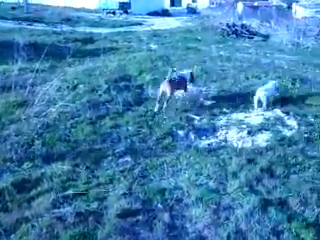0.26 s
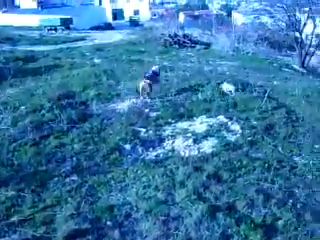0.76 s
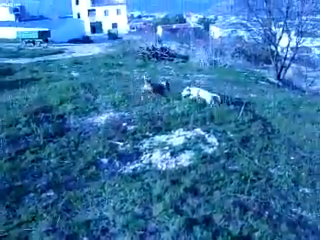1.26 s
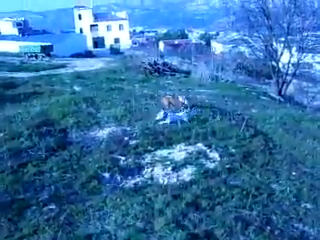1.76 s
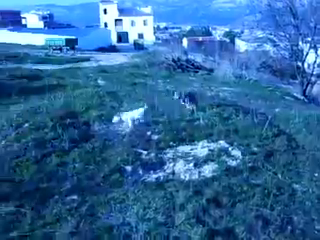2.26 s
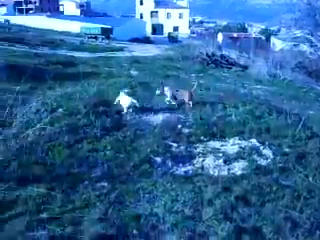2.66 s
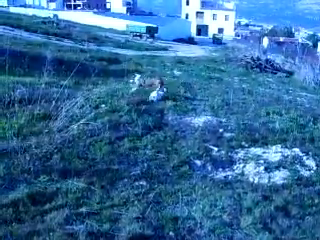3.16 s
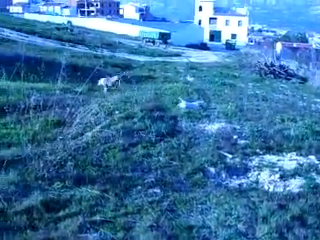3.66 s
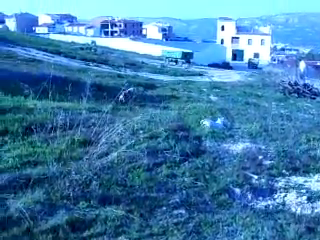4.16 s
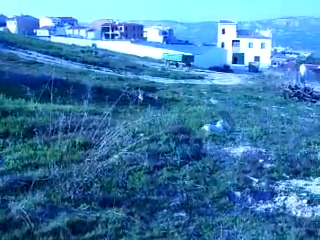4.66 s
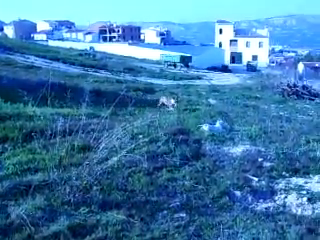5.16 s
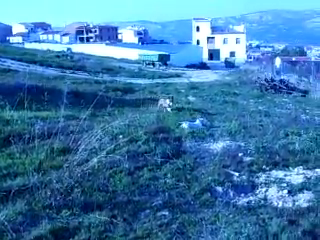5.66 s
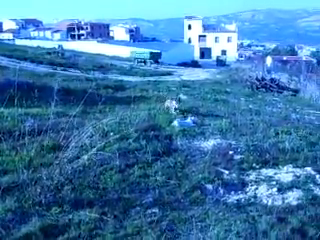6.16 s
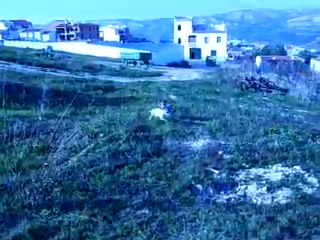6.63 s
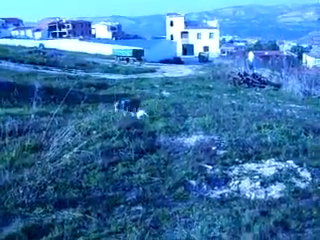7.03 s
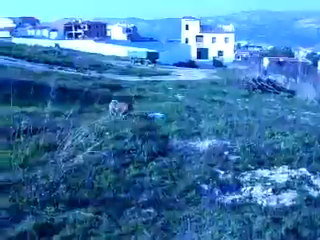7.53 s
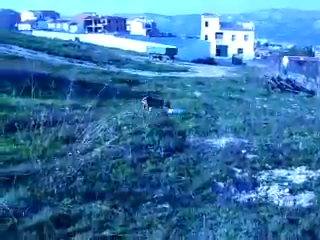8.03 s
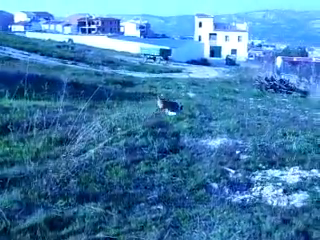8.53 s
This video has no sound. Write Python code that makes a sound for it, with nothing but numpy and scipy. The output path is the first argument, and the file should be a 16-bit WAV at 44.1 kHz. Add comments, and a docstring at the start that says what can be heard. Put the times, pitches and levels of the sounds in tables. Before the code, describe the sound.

Close, crisp snapping and rustling of dry brush, loudest just after two seconds, sparse midway, returning later above a quiet, open-air hush.

```python
"""Open field, close to the camera: dry grass and stalks snap and rustle, with short thuds and dull knocks.
Each snap is an impulse and a dying spray of smaller ones, filtered by the grass; filtered click noise
makes the rustle, and swelling sweeps and narrow-band swishes of blades pass between the snaps.
Far off: filtered noise for the hush of a town, wavering peeps with echo, a drifting hiss.
Low noise makes a light breeze, sines the camera's thin whine. One microphone feeds both channels."""
import sys
import numpy as np
from scipy import signal
from scipy.fft import rfft, irfft
from scipy.io import wavfile
from scipy.ndimage import uniform_filter1d

SR = 44100
rng = np.random.default_rng(int(sys.argv[2]) if len(sys.argv) > 2 else 0)


def file_out(sig):
    """Save sig as 16-bit WAV at sys.argv[1]."""
    # one column per channel
    cols = np.atleast_2d(sig).T
    # limit, then scale
    lim = np.clip(cols, -1, 1)
    pcm = np.round(lim * 32767).astype(np.int16)
    wavfile.write(sys.argv[1], SR, pcm)


def gain_from_decibels(decibels):
    """Convert decibel values to linear amplitude factors."""
    exponent = np.asarray(decibels, float) / 20
    return 10 ** exponent


N = 387638
T = np.arange(N) / SR
TAPS = 512  # length of the grass response, samples
BINS_HZ = np.linspace(0, SR / 2, TAPS // 2 + 1)


def on_log(hz, table):
    """Spectral interpolation: read an (f/Hz, level/dB) table on a log-frequency axis."""
    f, db = np.transpose(table)
    return np.interp(np.log(np.maximum(hz, 1)), np.log(f), db)


def causal(db):
    """Minimum phase: the shortest-delay response with the given dB gains from 0 Hz to SR / 2."""
    cepstrum = irfft(db * np.log(10) / 20)
    half = len(cepstrum) // 2
    cepstrum[1:half] *= 2
    cepstrum[half + 1:] = 0
    return irfft(np.exp(rfft(cepstrum)))


def unit(x):
    """Normalization: scale to rms 1."""
    return x / np.sqrt(np.mean(x ** 2))


def walk(rate):
    """Slow random modulation: levels held 1 / rate s and smoothed twice; spread near 1."""
    hold = int(SR / rate)
    steps = np.repeat(rng.standard_normal(N // hold + 1), hold)
    return 1.43 * uniform_filter1d(uniform_filter1d(steps, hold), hold)[:N]


def clicks(shape, per_s, spread_db):
    """Impulsive noise: random clicks of either sign, a few much larger than the rest."""
    hit = rng.random(shape) < per_s / SR
    size = gain_from_decibels(spread_db * np.minimum(rng.exponential(size=shape), 5))
    return hit * rng.standard_normal(shape) * size


def swell(rows, gains):
    """Incoherent addition: powers of strokes that swell and fade, one line per gain."""
    power = np.zeros((len(gains[0]), N))
    for (at, db, swell_s, fade_s), gain in zip(rows, gains):
        swell_s, fade_s = max(swell_s, .002), max(fade_s, .002)
        # each stroke is followed to 30 dB below its loudest
        near = slice(max(int((at - 3 * swell_s) * SR), 0), int((at + 3 * fade_s) * SR))
        age = T[near] - at
        drop_db = 10 * np.where(age < 0, -age / swell_s, age / fade_s)
        power[:, near] += (gain * gain_from_decibels(db - drop_db)) ** 2
    return power


# relative spectrum of town hush and microphone hiss: f/Hz, level/dB (per Hz)
HUSH_SPECTRUM = [(25, -14), (55, -5.5), (130, -9), (350, -6), (560, -7.5), (800, -1), (1160, 0.5),
                 (1450, -3), (1750, -7), (2550, -8.5), (4400, -10.5), (5280, -13), (6500, -7.5),
                 (8400, -15), (12500, -20.5), (15000, -18), (16500, -18.5)]


def hush(level_db=-59.5, swell_db=.3, flicker_db=1.3):
    """Filtered noise: half-octave bands swell together; those below a few kHz flicker most alone."""
    hz, noise = np.fft.rfftfreq(N, 1 / SR), rfft(rng.standard_normal(N))
    shaped, out = noise * gain_from_decibels(on_log(hz, HUSH_SPECTRUM)), 0
    for centre in 20 * 2 ** np.arange(0, 10.1, .5):
        share = np.clip(1 - 2 * np.abs(np.log2(np.maximum(hz, 1) / centre)), 0, 1)
        flicker = gain_from_decibels(flicker_db * walk(2.884) / (1 + centre / 1700.0))
        out = out + irfft(shaped * share, N) * flicker
    return gain_from_decibels(level_db + swell_db * walk(0.69)) * unit(out)


# camera whine: f/Hz, level/dB (rms before the flicker)
WHINE_TONES = [(2379, -84), (4679, -75), (7537, -84), (7596, -82), (7655, -72), (7714, -72), (7773, -82),
               (14040, -81)]


def whine(flicker_db=1.6):
    """Sum of pure tones: electrical whine, steady in pitch and flickering in level."""
    out = np.zeros(N)
    for hz, db in WHINE_TONES:
        tone = np.sqrt(2) * np.sin(2 * np.pi * (hz * T + rng.random()))
        out += gain_from_decibels(db + flicker_db * walk(15.0)) * tone
    return out


# puffs of a light breeze, added to its resting level: t/s, level/dB
GUST_PUFFS = [(0.56, -83), (1.85, -80), (2.3, -79), (3.67, -80), (4.33, -80), (5.3, -80), (6.0, -79),
              (6.66, -79)]


def breeze(low_hz=20., high_hz=36., resting_db=-85, gust_s=0.17):
    """Band-limited pressure noise: slow swings at the microphone port, in light gusts."""
    level = gain_from_decibels(resting_db)
    for s, db in GUST_PUFFS:
        level = level + gain_from_decibels(db) * np.exp(-.5 * ((T - s) / gust_s) ** 2)
    band = signal.butter(2, [low_hz, high_hz], "band", fs=SR, output="sos")
    return level * unit(signal.sosfilt(band, rng.standard_normal(N)))


# how much the grass stirs between sweeps: t/s, level/dB (main band)
STIR_LEVELS = [(0.0, -64.5), (1.05, -65.5), (1.55, -72), (1.8, -66), (3.1, -66), (3.75, -66), (4.5, -70),
               (5.0, -79), (6.1, -84), (6.9, -69), (8.1, -68.5), (8.79, -74)]
# sweeps through the blades: t/s (loudest), level/dB (main band), swell/s per 10 dB, fade/s per 10 dB,
# coarse stalks/dB re main band; a swell or fade below 0.002 s plays as 0.002 s
BLADE_SWEEPS = [(0.05, -52, 1, 0.04, 0.5), (0.13, -52, -0.5, -0.07, -15), (0.36, -58, 0, 0.06, 0.5),
                (0.575, -51.5, .02, 0.16, -4.5), (0.615, -53, .015, 0.04, -8),
                (0.635, -57.5, -0.03, 0.16, -3), (0.93, -64, 0.9, -0.04, -1), (1.125, -65, -0.1, -0.07, -5),
                (1.169, -51, 0, 0.03, -8), (1.19, -52, .02, 0.03, -7), (1.21, -56, 0.05, 0, -3),
                (1.345, -49, 0.03, -0.05, -8), (1.47, -64.5, 0.1, 0, -3), (1.655, -62.5, 0.25, 0.2, 0),
                (1.89, -56, .01, -0.2, 1), (1.925, -49, 0.02, -0.1, -6), (2.012, -60, 0.08, -0.2, -5),
                (2.05, -48, 0, 0, -6), (2.091, -43.5, 0.05, 0.05, -5), (2.19, -63, 0.02, 0.03, -6),
                (2.226, -41.5, 0.0438, 0, -3.5), (2.246, -39.5, 0.005, 0.0163, -4),
                (2.259, -42, 0.03, 0.0142, -4), (2.287, -44.5, 0.02, .02, -5),
                (2.31, -43, 0.0261, 0.0246, -6.5), (2.338, -49, -0.02, 0, -1),
                (2.365, -46, -0.17, -0.04, -7), (2.41, -64, -0.3, 0.1, -9), (2.48, -51, 0.13, 0.07, 0),
                (2.56, -56.5, -0.2, 0.12, 0), (2.607, -55, -0.06, 0.04, -5),
                (2.665, -55.5, -0.74, 0.12, -4), (2.739, -54, -0.12, 0.07, -2), (2.87, -53, -0.23, 0.1, -6),
                (3.02, -55.5, -0.33, 0.11, -6), (3.15, -65, 0.5, 0.1, 0), (3.425, -54, 0.01, 0, -5),
                (3.45, -60, 0.1, .04, 0.5), (3.515, -57.5, 0.02, 0.08, 7), (3.55, -52.5, 0, 0.04, -8),
                (3.594, -53, -0.01, 0.03, -2), (3.87, -67, 0.5, -0.12, -3), (4.03, -61, -0.1, 0, 3),
                (4.21, -68, 0.3, -0.1, 1.5), (4.42, -64, .03, 0.05, -5), (4.654, -58.5, -0.23, 0.04, -2.5),
                (5.14, -71, .15, 0.3, -3), (5.5, -68, 0.1, 0, 0), (4.8, -72, -3.5, 0.4, 0),
                (6.15, -74, 0.2, 0.3, 7), (6.7, -68, -0.07, -1.3, -3), (6.43, -67, -0.6, 0.2, 0),
                (6.56, -63.5, -0.15, 0.24, -2), (6.94, -59, 0.03, 0.07, -2), (7.12, -63, 0.05, -0.03, -4),
                (7.195, -52, 0.02, -0.05, -10), (7.33, -60.5, 0.02, 0.05, -4), (7.43, -57.5, 0, 0.1, -6),
                (7.55, -59.5, 0.1, 0.07, -5), (7.755, -57, 0, 0.03, 3), (7.8, -55, 0.04, 0.03, 3.5),
                (8.268, -56.5, 0, 0.03, -2), (8.312, -60, -0.07, .02, -2), (8.36, -51.5, 0.02, 0.04, -6.5),
                (8.44, -68, 0.3, -0.2, -6)]


def stirring(stir_coarse_db=-4, fine_db=-1.5, fine_per_coarse=-0.34):
    """Energy summation: levels of coarse, main and fine blades from a slow stir plus sweeps."""
    def colour(coarse_db):
        # sweeps rich in coarse stalks have fewer fine tips
        return gain_from_decibels(np.array([[coarse_db], [0], [fine_db + fine_per_coarse * coarse_db]]))

    s, db = np.transpose(STIR_LEVELS)
    stir = gain_from_decibels(np.interp(T, s, db)) * colour(stir_coarse_db)
    sweeps = swell([row[:4] for row in BLADE_SWEEPS], [colour(row[4]) for row in BLADE_SWEEPS])
    return np.sqrt(stir ** 2 + sweeps)


# relative spectrum of dry grass as the microphone hears it: f/Hz, level/dB (per Hz)
GRASS_SPECTRUM = [(200, -23), (1000, -22), (1800, -14), (2800, -17.5), (3500, -8.5), (4100, -4.5),
                  (4900, -6), (5250, -10.5), (5600, 2.5), (7400, 0.5), (8400, -5), (10800, -8), (15100, -9),
                  (20000, -4)]


def grass_response(ring_db=0):
    """Impulse response: what one click in the grass sounds like, with an optional stalk resonance."""
    return causal(on_log(BINS_HZ, GRASS_SPECTRUM) + ring_db)


def rustle(levels, patchy_db=1.5, own_db=1.0, coarse_hz=4830.0, fine_hz=8700.):
    """Granular excitation: dense clicks in patches; coarse stalks speak low, fine tips high."""
    grains = clicks(N, per_s=4500., spread_db=2.7) * gain_from_decibels(patchy_db * walk(150.))
    grass = signal.fftconvolve(grains, grass_response())[:N]
    out = np.zeros(N)
    bands = [(coarse_hz, "low"), ([coarse_hz, fine_hz], "band"), (fine_hz, "high")]
    for (edge_hz, kind), level in zip(bands, levels):
        stems = signal.sosfilt(signal.butter(4, edge_hz, kind, fs=SR, output="sos"), grass)
        # each size of stem comes and goes on its own, so the colour keeps changing
        out += level * unit(stems * gain_from_decibels(own_db * walk(120.)))
    return out


def small_snaps(main, per_s=14, over_rustle_db=2, spread_db=3, pitch_db=2, spray_db=-15):
    """Random point process: small stalks break at any time, louder where the grass stirs harder."""
    s, size, pitch = rng.random((int(per_s * N / SR), 3)).T
    s = s * (N - 1) / SR
    db = 20 * np.log10(main[(s * SR).astype(int)]) + over_rustle_db + spread_db * (2 * size - 1)
    stalk_hz = 3300 * 4 ** pitch
    return list(zip(s, db, stalk_hz, np.full(len(s), pitch_db), np.full(len(s), spray_db)))


# the clear snaps: t/s (start), level/dB (rms of the first 5 ms), f/Hz of the stalk,
# strength of that pitch/dB, tearing fibres/dB re the click
CLEAR_SNAPS = [(0.0166, -47, 6600, 5, -15), (0.0325, -45.5, 6600, 5, -12), (0.048, -42, 3280, 15, -14),
               (0.0505, -46, 4500, -0.5, -22), (0.1431, -46.5, 4100, 0.5, -9),
               (0.2037, -50.5, 4100, 6, -11), (0.2308, -46.5, 4400, 9, -17), (0.2418, -57, 5700, 10, -28),
               (0.2697, -57, 3300, 4, -13), (0.2862, -64, 3320, 5.5, -24), (0.3444, -49, 3300, 5, -10),
               (0.3829, -55, 3500, 8, -17), (0.4037, -58, 8100, 2, -22), (0.4391, -54, 3800, 12, -26),
               (0.4542, -60, 10800, 5, -23), (0.5179, -55, 3320, 7, -26), (0.5286, -46, 4430, 11, -16),
               (0.5688, -47, 4400, 9, -15), (0.5751, -40, 11000, 7, -20), (0.5775, -45, 3300, -1, -18),
               (0.594, -51, 12500, 12, -20), (0.6191, -45, 5700, 9, -26), (0.6261, -41.5, 3300, -1, -16),
               (0.6705, -57, 6200, 6, -20), (0.756, -43, 7000, 3, -20), (0.8059, -47, 5400, 6, -10),
               (0.8199, -50, 4700, 6, -12), (0.9256, -45.5, 4100, 10, -13), (0.9331, -47.5, 4100, 8, -8),
               (0.939, -59, 5000, 6, -26), (0.9551, -63, 5700, 8, -24), (1.0063, -52, 4400, 3, -12),
               (1.0915, -54, 4100, 10, -31), (1.1708, -40, 9000, 7, -26), (1.1861, -47, 6200, 5, -15),
               (1.2178, -59, 13200, 8, -24), (1.2973, -48.5, 8100, 7, -13), (1.3501, -45, 5700, 6, -11),
               (1.3583, -46, 5400, 2, -11), (1.3792, -49, 10000, 8, -23), (1.5791, -57, 3800, 14, -25),
               (1.6485, -44.5, 6300, 6, -23), (1.6557, -51, 5700, 0, -17), (1.7761, -58, 3300, 5, -22),
               (1.8326, -51, 5400, 4, -11), (1.8941, -49.5, 6600, 7, -16), (1.9237, -46, 7000, 7, -9),
               (1.9384, -48, 6600, 5, -20), (1.9462, -49, 3300, 5, -26), (1.9609, -53, 3800, 5, -26),
               (2.0095, -51, 3800, 12, -10), (2.0346, -26.5, 4760, 6, -16.5), (2.0731, -27, 8700, 7, -16),
               (2.0845, -41.5, 7600, 5, -17), (2.0972, -35, 12300, 5, -17), (2.1726, -42, 7600, 2, -22),
               (2.204, -43, 11500, 12, -19), (2.2253, -31.5, 11500, 4, -21), (2.2415, -40, 9000, -2, -8),
               (2.2448, -34.5, 6600, 5, -12), (2.2545, -32.5, 10000, 3, -11), (2.27, -38.5, 6600, 12, -26),
               (2.2841, -38, 13200, 5, -10), (2.3042, -38.5, 10600, 4, -6), (2.3181, -37, 6200, 8, -18),
               (2.3355, -42, 4400, -2, -8), (2.3398, -42, 7100, 6, -18), (2.3895, -40, 6600, 5, -11),
               (2.3962, -52, 7100, 7, -16), (2.4112, -48, 13200, 12, -17), (2.4486, -46, 5700, 0, -16),
               (2.4669, -46, 5000, 8, -26), (2.5005, -43.5, 3800, 3, -18.5), (2.5134, -53, 4100, 14, -15),
               (2.5305, -60, 4700, -1, -18), (2.5534, -43.5, 5000, 6, -13), (2.5595, -51, 4100, 6, -15),
               (2.578, -48, 3300, 3, -11), (2.6027, -43, 4400, 1, -7), (2.6079, -37.5, 3280, 8, -17),
               (2.6294, -56, 4100, 7, -12), (2.641, -57, 7600, 4, -26), (2.6615, -49, 4100, 4, -14),
               (2.6683, -50, 8100, 4, -14), (2.6959, -43, 5400, 2, -17), (2.7124, -43, 10700, 3, -22),
               (2.7612, -57, 4400, 7, -13), (2.7742, -47.5, 13200, 4, -13), (2.7905, -52, 8700, 8, -14),
               (2.8626, -42.5, 4100, 4, -17), (2.8678, -47, 5000, 13, -16), (2.8747, -48, 9300, 8, -25),
               (2.9083, -51, 10700, 6, -15), (2.9231, -59, 5400, 14, -17), (2.9359, -56, 3800, 18, -25),
               (2.9522, -56, 8100, 4, -13), (3.0089, -47.5, 7100, 4, -15), (3.1121, -58, 7600, 2.5, -11),
               (3.1727, -59.5, 5000, 11, -12), (3.3027, -52, 5400, 3, -13), (3.4258, -46.5, 6200, 4, -17),
               (3.4452, -52, 3300, 1, -11), (3.4522, -54, 4700, 13, -17), (3.4849, -51, 3300, 4, -17),
               (3.5285, -38, 3360, 12, -10), (3.541, -38, 5000, 7, -9), (3.5728, -42.5, 9000, 8, -16),
               (3.5874, -48, 3500, 11, -12), (3.5942, -37, 4970, 5, -7), (3.6511, -55, 4400, 13, -11),
               (3.6599, -53, 5400, 9, -13), (3.8474, -49, 5000, 5, -12), (3.8599, -38, 4870, 7, -14),
               (3.9727, -56.5, 3300, 4, -22), (4.2159, -59, 4400, 5, -26), (4.2212, -55, 3800, 10, -19),
               (4.3862, -40, 4400, 18, -16), (4.4087, -51, 3300, 14, -13), (4.4162, -45, 3800, 12, -22),
               (4.4217, -52, 4400, 19, -15), (4.4277, -50, 5400, 10, -20), (4.5407, -54, 11000, 4, -16),
               (4.572, -58, 4400, 9, -16), (4.6485, -51.5, 4670, 14, -13), (4.726, -55, 5000, 14, -10),
               (4.857, -56, 4400, 17, -11), (5.1717, -54, 5700, 8, -15), (5.4608, -58, 4400, 11, -14),
               (5.5047, -56, 3500, 6, -12), (5.5127, -52, 3300, 1, -9), (5.5184, -53.5, 3800, 11, -21),
               (5.5606, -51.5, 7100, 5, -14), (5.7027, -52, 3500, 16, -27), (5.8202, -58, 9000, -1, -18),
               (6.5498, -57, 4100, 7, -16), (6.6942, -65, 10000, 4, -16), (6.8562, -55, 11500, 2, -17),
               (6.9524, -51, 4360, 15, -6), (7.1309, -44.5, 10000, 6, -22), (7.1559, -52, 3800, 10, -14),
               (7.173, -44.5, 3400, 11, -22), (7.191, -47, 3320, 10, -17), (7.2102, -50, 5400, 7, -21),
               (7.241, -56, 4100, 8, -14), (7.3219, -55, 4700, 4, -26), (7.329, -42.5, 5700, 7, -21),
               (7.3342, -51, 11500, 8, -14), (7.3403, -43.5, 5600, 9, -23), (7.3655, -51, 8700, 5, -26),
               (7.3762, -51, 3300, 8, -14), (7.385, -59, 6600, 2, -21), (7.4151, -35, 10100, 6.5, -5),
               (7.438, -58, 5000, 7, -22), (7.4582, -50, 5000, 20, -17), (7.4818, -56, 3300, 6, -14),
               (7.5476, -53, 3800, 8, -10), (7.5514, -56, 5400, 7, -18), (7.5875, -51.5, 4400, 7, -22),
               (7.6184, -56.5, 3800, 14, -16), (7.6657, -59, 11500, 6, -21), (7.7483, -47.5, 3300, 9, -12),
               (7.8196, -48, 10000, 3, -15), (7.8676, -53, 13200, 7, -18), (8.2587, -47, 3300, 3, -16),
               (8.2661, -50, 4100, 8, -9), (8.2707, -57, 4700, 9, -15), (8.3059, -52, 4400, 10, -18),
               (8.3118, -52, 3800, 6, -12), (8.3465, -24.5, 8300, 8, -18), (8.3568, -47, 6600, 6, -12),
               (8.4226, -57, 4400, 6, -19), (8.4436, -60, 3500, 14, -20), (8.4492, -55, 3300, 8, -12)]


def snaps(main, lead_s=.0009, lead_over_spray_db=2.0, pitch_octaves=0.26):
    """Impulse excitation of a resonance: a stalk gives, clicks, then its fibres tear in a dying spray."""
    spray_len, spray_t60_s, burst_s = 2048, 0.027, .005
    split_db, split_t60_s = -5, 0.0069
    puff_db, puff_s, puff_per_db = -4.5, .00006, .3
    rows = list(CLEAR_SNAPS) + small_snaps(main)
    out, age = np.zeros(N + spray_len + TAPS), np.arange(spray_len) / SR - lead_s
    fibres = unit(clicks((len(rows), spray_len), per_s=9000.0, spread_db=1.5))
    lead = 20 * age / lead_s + lead_over_spray_db
    fade = gain_from_decibels(np.where(age < 0, lead, -60 * age / spray_t60_s))
    # the wall of the stalk splits from the click on, over the spray
    fade = fade + (age >= 0) * gain_from_decibels(split_db - 60 * np.maximum(age, 0) / split_t60_s)
    # a one-way puff of air, more than its share for a big stalk: a low thump
    puff = np.exp(-.5 * (age / puff_s) ** 2)
    for (s, db, hz, pitch_db, spray_db), spray in zip(rows, fibres):
        push = gain_from_decibels(spray_db) * spray * fade
        push[np.argmax(age >= 0)] = 1
        octaves = np.log2(np.maximum(BINS_HZ, 1) / hz)
        ring_db = pitch_db * np.exp(-.5 * (octaves / pitch_octaves) ** 2)
        sound = signal.fftconvolve(push, grass_response(ring_db))
        burst_rms = np.sqrt(np.mean(sound[:int(burst_s * SR)] ** 2))
        i = int(s * SR)
        out[i:i + len(sound)] += gain_from_decibels(db) * sound / burst_rms
        out[i:i + spray_len] += gain_from_decibels(puff_db + (1 + puff_per_db) * db) * puff
    return out[:N]


# swishes of thin blades: t/s (loudest), level/dB, swell/s per 10 dB, fade/s per 10 dB;
# a swell or fade below 0.002 s plays as 0.002 s
BLADE_SWISHES = [(0.03, -47, -1.7, 0.01), (0.225, -56.5, .05, 0.1), (0.56, -48, 0, 0.07),
                 (0.62, -50.5, 0, 0.14), (0.715, -60, 0.03, 0.17), (0.815, -60.5, 0, 0.44),
                 (2.265, -45, 0.03, 0), (2.48, -56, 0.2, 0), (2.74, -62, 0.2, 0.16), (2.9, -59, 0.2, .1)]
# lower and upper edge of their band: f/Hz
SWISH_BAND = [5400, 7100]


def swish(waver_db=1.8):
    """Friction noise: thin blades brush past each other, a grainy hiss in one narrow band."""
    level = np.sqrt(swell(BLADE_SWISHES, np.ones((len(BLADE_SWISHES), 1, 1)))[0])
    band = signal.butter(2, SWISH_BAND, "band", fs=SR, output="sos")
    hiss = unit(signal.sosfilt(band, clicks(N, per_s=7000.0, spread_db=2.1)))
    return level * gain_from_decibels(waver_db * walk(60.)) * hiss


# faint far peeps: t/s (start), length/s, f/Hz, level/dB (rms before the echo)
FAR_PEEPS = [(0.33, 0.049, 1590, -66), (0.488, 0.004, 2230, -53.5), (0.045, 0.025, 1570, -55.5),
             (0.049, 0.031, 2950, -57), (0.575, 0.01, 3070, -57), (0.624, 0.0084, 2940, -50.5),
             (1.304, 0.0043, 2440, -50.5), (1.954, 0.044, 1674, -68), (2.582, .06, 3130, -74),
             (2.827, 0.03, 2770, -65.5), (2.862, 0.025, 2790, -67), (3.42, 0.038, 2700, -69),
             (3.72, 0.05, 1945, -68), (3.729, 0.087, 1396, -68), (3.895, 0.051, 1386, -66),
             (4.09, 0.12, 2780, -70.5), (5.068, .018, 3970, -67), (5.095, .05, 3600, -72),
             (5.108, .016, 2800, -71), (5.14, 0.093, 1816, -68), (5.07, .015, 5700, -70),
             (5.188, 0.037, 2160, -66), (5.198, .03, 3830, -66), (5.272, 0.14, 2795, -72.5),
             (5.35, 0.063, 1815, -68), (5.804, 0.066, 2050, -71), (5.853, 0.04, 2020, -62),
             (5.815, .07, 3840, -70), (5.833, 0.028, 4400, -62), (5.884, 0.014, 4450, -55),
             (5.88, .014, 6150, -65), (5.905, 0.046, 2025, -64), (5.91, 0.038, 3890, -62.5),
             (5.92, 0.017, 4300, -63), (5.955, 0.048, 2070, -70), (6.07, 0.17, 2066, -66),
             (6.134, 0.026, 3950, -69), (6.13, .02, 4450, -72), (6.142, .012, 6040, -75),
             (6.15, 0.044, 2320, -65), (6.274, 0.055, 2080, -70), (6.449, 0.05, 1970, -71),
             (6.523, 0.028, 1966, -64.5), (6.53, .03, 3820, -70), (6.574, 0.11, 2790, -74),
             (6.71, 0.11, 2840, -74), (7.758, 0.03, 1106, -62), (7.781, 0.027, 928, -61),
             (7.932, 0.1, 2780, -73), (8.58, 0.05, 2004, -71), (8.735, 0.012, 3750, -61.5),
             (8.747, 0.015, 4100, -64)]


def peeps(waver_hz=42., wavers_per_peep=1.8, steady=1.1):
    """Narrow-band modulation: soft-edged tones waver in pitch and strength on the way through the air."""
    out, air = np.zeros(N), rng.standard_normal((len(FAR_PEEPS), 2, SR // 4))
    for (s, length, hz, db), noise in zip(FAR_PEEPS, air):
        width_hz = waver_hz + wavers_per_peep / length  # short peeps are wider
        i = int(s * SR)
        age = np.arange(min(int(length * SR), SR // 4, N - i)) / SR
        waver = uniform_filter1d(noise, int(SR / width_hz / 2))
        waver = uniform_filter1d(waver, int(SR / width_hz / 4))
        # steady is the part that holds its pitch, re the wavering part
        waver = unit(waver[:, :len(age)]) + np.array([[steady], [0]])
        turn = 2 * np.pi * hz * age
        tone = waver[0] * np.cos(turn) + waver[1] * np.sin(turn)
        out[i:i + len(age)] += gain_from_decibels(db) * unit(tone * np.sqrt(np.sin(np.pi * age / length)))
    return out


def far_echo(x, echo_db=-5.0, t60_s=0.99):
    """Diffuse reverberation: scattered returns from slopes and walls smear what comes from afar."""
    age = np.arange(SR // 2) / SR
    tail = rng.standard_normal(SR // 2) * gain_from_decibels(-60 * age / t60_s)
    return x + gain_from_decibels(echo_db) * signal.fftconvolve(x, tail / np.sqrt(np.sum(tail ** 2)))[:N]


# short low thuds and dull knocks, most of them beside the snaps: t/s, f/Hz, level/dB (peak before damping)
THUDS_AND_KNOCKS = [(2.225, 1050, -45), (2.241, 230, -59), (2.252, 110, -64), (2.254, 1800, -53),
                    (1.272, 290, -58), (3.52, 1750, -58)]


def thuds(cycles=2.5):
    """Damped oscillation: a short swing of a few cycles."""
    out = np.zeros(N)
    for s, hz, db in THUDS_AND_KNOCKS:
        turns = np.arange(int(3 * cycles * SR / hz)) * hz / SR
        i = int(s * SR)
        swing = np.sin(2 * np.pi * turns) * np.exp(-3 * turns / cycles)
        out[i:i + len(turns)] += gain_from_decibels(db) * swing
    return out


# a faint far band of hiss that swells and drifts down: t/s (start), length/s, from f/Hz, to f/Hz, level/dB
HISS_DRIFTS = [(1.42, 0.35, 2257, 1706, -67), (1.842, 0.2, 2100, 1600, -71)]


def drifts(width_hz=490, waver_db=4.5):
    """Quadrature modulation: narrow noise carried on a falling centre, wavering in strength."""
    band = signal.butter(2, width_hz / 2, fs=SR, output="sos")
    air = unit(signal.sosfilt(band, rng.standard_normal((2, N)))) * gain_from_decibels(waver_db * walk(19.0))
    out = np.zeros(N)
    for s, length, from_hz, to_hz, db in HISS_DRIFTS:
        part = np.clip((T - s) / length, 0, 1)
        turn = 2 * np.pi * np.cumsum(from_hz + (to_hz - from_hz) * part) / SR
        hiss = np.sqrt(2) * (air[0] * np.cos(turn) + air[1] * np.sin(turn))
        out += gain_from_decibels(db) * np.sin(np.pi * part) * hiss
    return out


def scene():
    """Superposition: the pressures of all sources add at one microphone."""
    levels = stirring()
    far = hush() + far_echo(peeps()) + drifts()
    grass = rustle(levels) + snaps(levels[1]) + swish()
    mono = far + whine() + breeze() + grass + thuds()
    return np.array([mono, mono])


def low_pass(x):
    """Removes everything above the highest recorded frequency."""
    return signal.sosfilt(signal.butter(12, 16830, fs=SR, output="sos"), x)


# steep treble cut near 16 kHz: f/Hz, level/dB
TREBLE_CUT = [(15650, 0), (15900, -17), (16500, -25), (16800, -46)]


def record(dry):
    """Low-pass filtering: a steep treble cut near 16 kHz shapes the finished mix."""
    gain = gain_from_decibels(on_log(np.fft.rfftfreq(N, 1 / SR), TREBLE_CUT))
    mix = irfft(rfft(dry) * gain, N)
    return low_pass(mix)


dry = scene()
out = record(dry)
file_out(out)
```